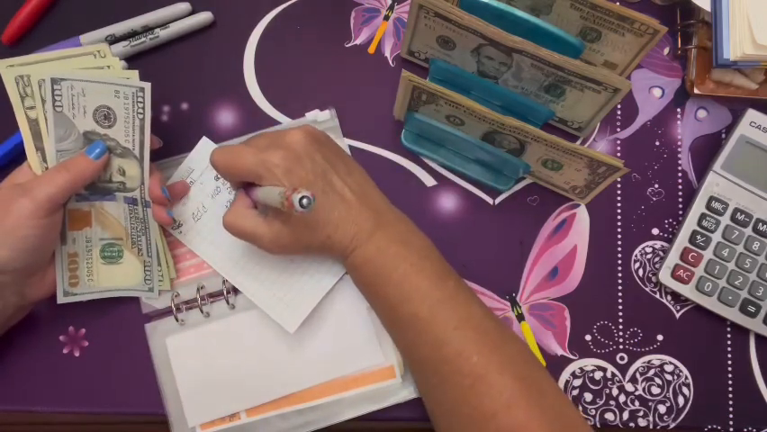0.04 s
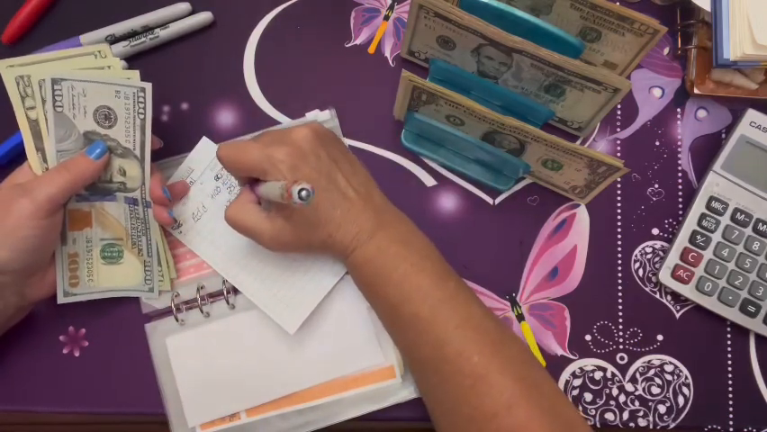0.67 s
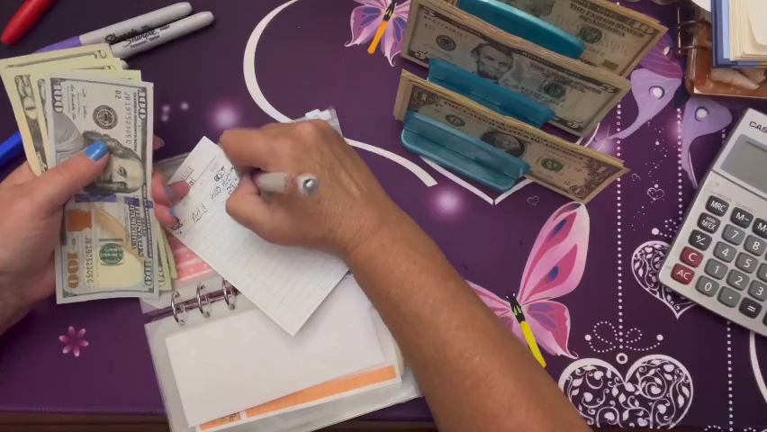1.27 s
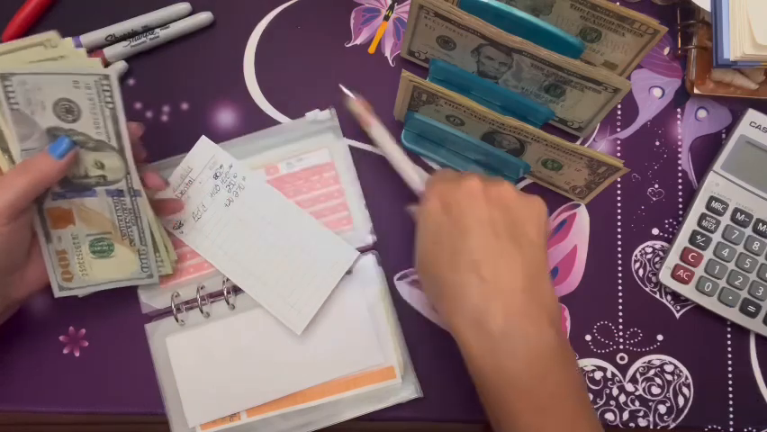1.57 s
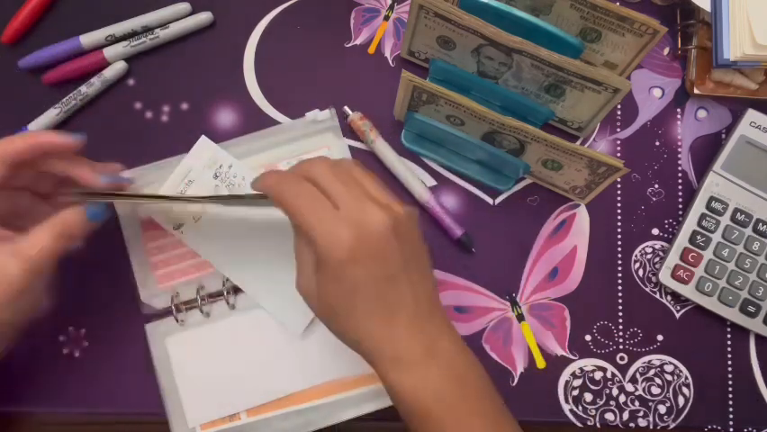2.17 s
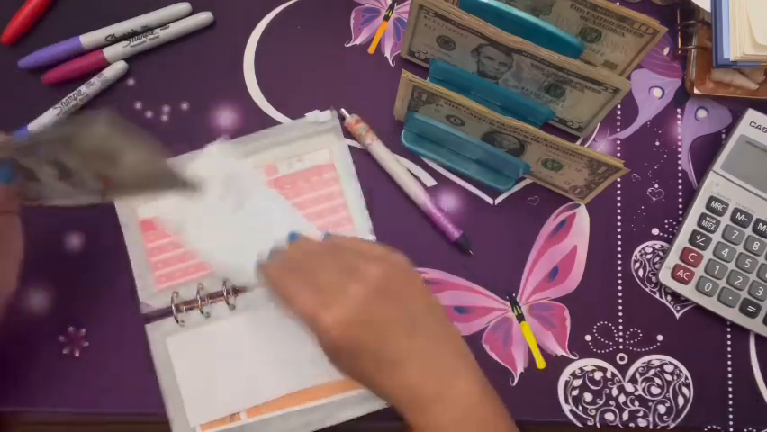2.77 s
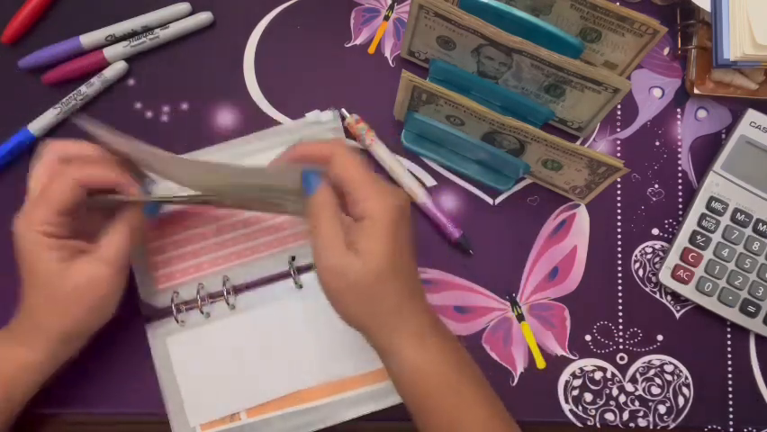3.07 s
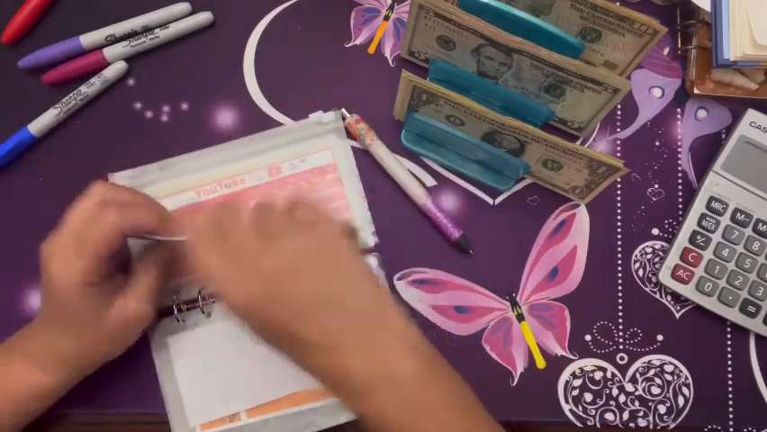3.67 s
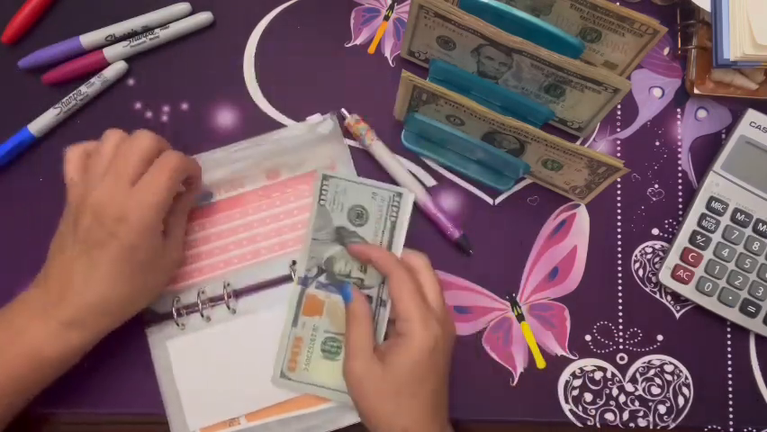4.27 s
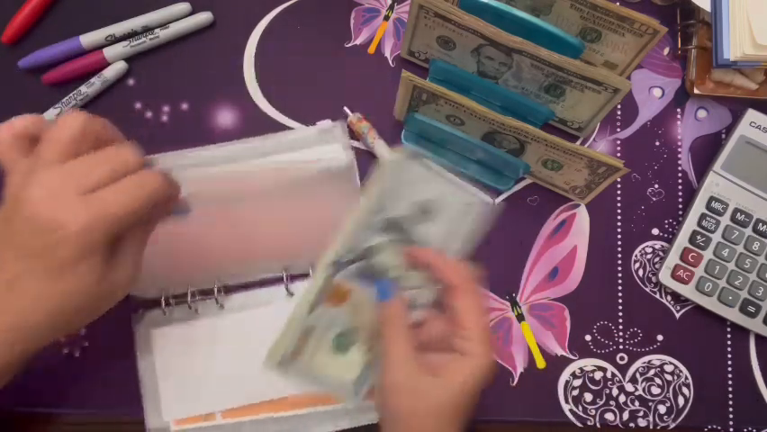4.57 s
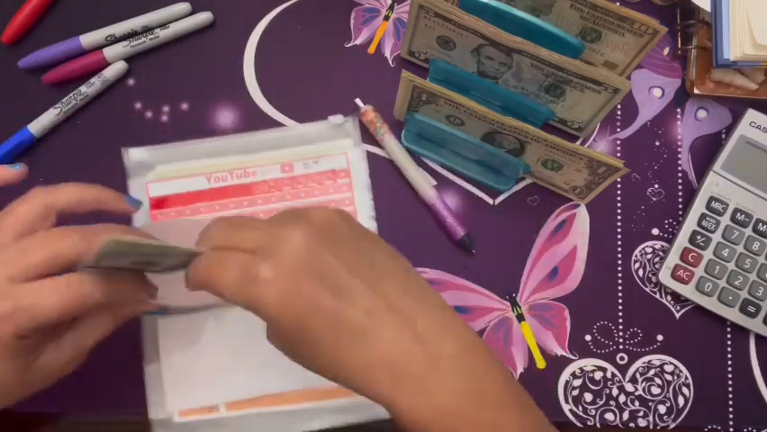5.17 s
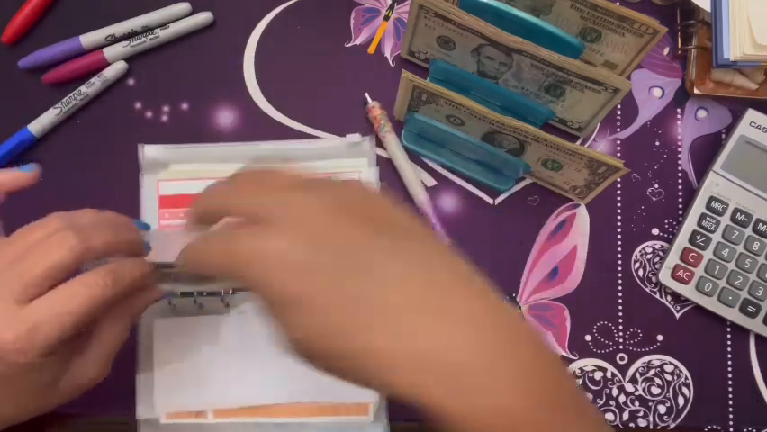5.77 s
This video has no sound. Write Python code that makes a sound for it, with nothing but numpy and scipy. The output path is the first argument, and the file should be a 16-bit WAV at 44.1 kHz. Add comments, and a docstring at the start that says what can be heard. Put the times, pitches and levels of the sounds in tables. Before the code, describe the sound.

A pen ticks faintly and clacks onto a desk, then banknotes are tapped, rustled and slid into crackling plastic over a faint hum.

```python
"""Banknotes handled at a desk in a small room, close to a stereo microphone: the wad is squared up, a slip
of paper is lifted away, a plastic pouch crackles open and the notes slide in. Creases snap, bulges pop
through, and sliding sheets stick and slip. Before that, a pen ticks faintly on the slip, then is put down:
its barrel clacks and the table top rings. Mains and a distant appliance hum faintly beneath."""
import sys
import numpy as np
from scipy import signal
from scipy.fft import rfft, irfft, next_fast_len
from scipy.io import wavfile
from scipy.ndimage import map_coordinates

SR = 44100
rng = np.random.default_rng(int(sys.argv[2]) if len(sys.argv) > 2 else 0)


def to_wav(sig):
    """Store sig (one row per channel, or 1-D mono) as 16-bit WAV at the path in sys.argv[1].

    Samples outside -1..1 are clipped; the rate is SR.
    """
    pcm = np.clip(np.atleast_2d(sig), -1, 1) * 32767
    pcm = np.round(pcm).astype(np.int16)
    wavfile.write(sys.argv[1], SR, pcm.T)  # frames by channels


N = 256706
TIME = np.arange(N) / SR
FFT_SIZE = next_fast_len(N + SR)
FREQ = np.maximum(np.arange(FFT_SIZE // 2 + 1) * SR / FFT_SIZE, 1)


def wad_landing(start_s=2.195, gap_s=0.007, snap_s=0.003, sheet_hz=1120, crack_hz=4800, edge_db=-6.5):
    """The wad is tapped on its edge: seven notes meet the desk one after another, hardest in mid-run."""
    off_peak = (np.linspace(0, 1, 7) / 0.49 - 1) ** 2
    contacts = []
    for note, off in enumerate(off_peak):
        sheet_db, crack_db = -29 - 23 * off, -31.5 - 7 * off
        contacts.append((start_s + note * gap_s, snap_s, sheet_hz, sheet_db, crack_db, crack_hz, edge_db))
    return snaps(contacts)


# Creases snapping and edges striking, close to the microphone: (time [s], length [s], sheet pitch [Hz],
# sheet level [dB], crack level [dB], crack pitch [Hz], relative edge brightness [dB])
CREASES = [(1.601, 0.00077, 1000, -46.5, -31, 4270, -18), (1.6696, 0.0026, 850, -48, -42, 5400, -4),
           (1.6838, 0.0014, 2300, -24.5, -24, 4950, -8), (1.794, 0.0018, 820, -75, -41.5, 6840, -7),
           (1.826, 0.0017, 1300, -70, -51, 6000, 1), (1.845, 0.0062, 1372, -66, -50.5, 5970, -1),
           (1.8985, 0.00094, 957, -62, -37.5, 6960, -4), (1.92, 0.0013, 1100, -53, -53, 4000, -11),
           (2.044, 0.0077, 840, -59.5, -53.5, 4800, -2), (2.265, 0.00087, 1250, -43, -45, 5200, -12),
           (2.628, 0.0047, 1020, -51.5, -51, 4500, -4), (2.641, 0.0012, 1170, -40.5, -44, 3600, -12),
           (2.651, 0.0018, 1320, -37.5, -39.5, 6200, -18), (2.727, 0.0025, 1192, -42, -53, 5600, -1),
           (2.787, 0.0023, 2130, -43, -37.5, 3970, -5), (3.031, 0.028, 830, -58.5, -50, 5100, -10),
           (3.101, 0.0054, 940, -52, -63, 5200, -4), (3.1261, 0.0019, 1190, -46.5, -35, 5130, -17),
           (3.128, 0.0017, 1130, -36, -28.5, 5360, -16), (3.175, .0011, 1160, -51, -47, 4300, -19),
           (3.5113, 0.0066, 2090, -48.5, -43, 5560, -10), (3.517, 0.0075, 2500, -44.5, -58, 7000, -7),
           (3.679, 0.0034, 1200, -56.5, -47, 5240, -3), (3.697, 0.0016, 990, -48.5, -44.5, 5400, -13),
           (3.732, 0.0048, 1690, -60, -46.5, 8400, -7), (3.937, 0.004, 1080, -68, -56.5, 3660, -8),
           (4.147, .0009, 900, -57, -73, 4700, -13), (4.2151, 0.0014, 1530, -36.5, -34.5, 4860, -24),
           (4.224, .0015, 1600, -52, -54, 6000, -4), (4.2394, 0.0023, 1110, -40.5, -47, 4200, -9),
           (4.248, 0.00085, 990, -45, -56, 4200, -13), (4.3149, 0.0013, 1400, -46.5, -39.5, 6000, -8),
           (4.323, 0.0015, 1400, -51, -40, 5230, -18), (4.357, 0.0038, 764, -49.5, -56, 4000, -11),
           (4.4261, 0.00086, 990, -37.5, -35.5, 3770, -20), (4.4305, 0.00079, 1500, -54, -55, 4700, -13),
           (4.4406, 0.0014, 1270, -35, -62, 3400, -16), (4.4475, 0.0011, 900, -44, -51, 4700, -9),
           (4.471, .003, 1300, -60, -51, 5000, -18), (4.477, 0.0011, 900, -48, -40, 4470, -14),
           (4.499, 0.0027, 1310, -50, -70, 4700, -13), (4.561, 0.0013, 1000, -54, -57, 4200, -16),
           (4.588, 0.0099, 1040, -54.5, -65, 4700, -13), (4.658, 0.0018, 950, -59, -75, 4700, -13),
           (4.672, .002, 650, -60, -70, 4700, -13), (4.683, 0.0068, 1580, -51, -60, 3800, -10),
           (4.689, 0.0028, 1650, -39, -42, 4500, -16), (4.72, 0.0018, 1670, -49, -56, 4700, -16),
           (4.809, 0.007, 1390, -55.5, -73, 4640, -2), (4.9395, .001, 2240, -56, -78, 3420, -6),
           (5.091, 0.0021, 826, -48.5, -72, 4700, -13), (5.193, 0.0014, 1240, -37, -50, 3200, -11),
           (5.399, 0.0085, 1650, -44, -56, 7000, 1), (5.546, 0.0019, 1190, -41, -63, 4700, -20),
           (5.645, .0018, 1300, -55, -71, 4700, -21), (5.687, 0.0017, 1680, -48, -55, 4670, -9),
           (5.782, 0.0016, 970, -52, -52, 7100, -6), (5.803, 0.0018, 1320, -41, -62, 3500, -16)]

def snaps(contacts, flutter_db=-20, flutter_s=0.019):
    """One sharp click and a run of smaller buckles: the sheet rings low, the crease cracks high."""
    out, t = np.zeros(N), TIME[:SR // 20]
    for start, length, sheet_hz, sheet_db, crack_db, crack_hz, edge_db in contacts:
        force = np.exp(-t / length) + from_db(flutter_db) * np.exp(-t / flutter_s)
        buckles = rng.choice([-1, 1], (3, len(t))) * force
        buckles[:, 0] = from_db([11, 14, 14])   # the opening click
        sheet = band(buckles[0], sheet_hz / 1.97, sheet_hz * 1.97)
        crack = band(buckles[1], crack_hz / 1.47, crack_hz * 1.47)
        edge = band(buckles[2], 9200, 15800)
        length_gain = np.sqrt(length * SR / len(t))   # levels hold over the snap's length
        for part, db in (sheet, sheet_db), (crack, crack_db + 0.5), (edge, crack_db + edge_db + 3.5):
            add(out, start, from_db(db) * rms_one(part) * length_gain)
    return out


# Sheets popping through with a hollow ring, close up: (time [s], pitch [Hz], peak level [dB])
BULGES = [(1.899, 913, -45.5), (2.216, 683, -36), (2.2219, 1400, -23), (2.229, 1145, -28),
          (2.236, 461, -40), (2.239, 1200, -29.5), (2.048, 905, -52.5), (2.651, 1350, -34),
          (2.71, 730, -48.5), (2.7285, 1234, -31.5), (3.032, 794, -47), (4.6901, 1690, -39),
          (4.958, 1500, -47), (5.3916, 1570, -32.5), (5.546, 996, -45)]

def pops(rise_cycles=1.48, sag=0.045):
    """A bulge flips over and rings for a few cycles, its pitch sagging as it relaxes."""
    out, t = np.zeros(N), TIME[:SR // 30]
    for start, hz, peak_db in BULGES:
        rise = rise_cycles / hz
        swell = t / rise * np.exp(1 - t / rise)
        pitch = hz * (1 + sag * (2 * np.exp(-t / (2 * rise)) - 1))
        add(out, start, from_db(peak_db) * swell * np.sin(2 * np.pi * np.cumsum(pitch) / SR))
    return out


# Sliding strokes of pen, paper and plastic at the desk: (time [s], push [s], fade [s], flex level [dB],
# hiss level [dB], relative sheen [dB], scrape pitch [Hz], scrape level [dB])
SLIDING_STROKES = [(0.445, 0.018, 0.039, -78, -86, -8, 3800, -77.5),
                   (1.273, 0.044, 0.06, -72.5, -67, 4, 8800, -72),
                   (1.345, 0.045, 0.16, -71.5, -62.5, -1, 2890, -69),
                   (1.604, 0.033, 0.25, -63, -64.5, -8, 3280, -58.5),
                   (1.691, 0.035, 0.076, -64, -50, -21, 2010, -51.5),
                   (1.8, 0.067, 0.25, -61.5, -61, 8, 6100, -64),
                   (1.968, 0.046, 0.071, -80, -60.5, 13.5, 6120, -70),
                   (2.164, 0.034, 0.022, -73, -64.5, 19, 8500, -71),
                   (2.203, 0.021, 0.079, -39.5, -42, -9, 4550, -45),
                   (2.332, 0.082, 0.045, -51, -49.5, 5.5, 4900, -57),
                   (2.47, 0.023, 0.11, -65.5, -66.5, -7, 1180, -75),
                   (2.63, 0.13, 0.11, -54, -48, 2.5, 1230, -80),
                   (2.752, 0.031, 0.015, -52, -44.5, -8, 3750, -47),
                   (2.81, 0.0089, 0.26, -65.5, -60, 0, 4020, -80),
                   (3.019, 0.045, 0.2, -59.5, -51, -9, 6100, -79),
                   (3.222, 0.0071, 0.26, -70, -59.5, -4, 5040, -67.5),
                   (3.448, 0.036, 0.22, -62, -55.5, -10, 5250, -72),
                   (3.591, 0.079, 0.095, -62.5, -53, 3.5, 5940, -73),
                   (3.737, 0.075, 0.17, -65.5, -62, 1.5, 5900, -74),
                   (3.96, 0.025, 0.061, -66.5, -66, -2, 6500, -68.5),
                   (4.1, 0.027, 0.13, -72.5, -71, -4, 1950, -84),
                   (4.223, 0.0085, 0.14, -56.5, -61.5, -8, 1900, -61),
                   (4.345, 0.074, 0.14, -62, -62, 0, 1670, -60),
                   (4.408, 0.062, 0.11, -64, -60, -4, 5400, -77),
                   (4.54, 0.017, 0.26, -62, -63.5, -3, 930, -72),
                   (4.69, .02, 0.31, -66, -76.5, 6, 1480, -80),
                   (4.865, 0.013, 0.022, -80, -78, 12, 7500, -70),
                   (4.96, 0.041, .07, -66, -59, 4.5, 3200, -67),
                   (5.01, 0.06, 0.081, -56.5, -49.5, -1, 3560, -61),
                   (5.151, 0.05, 0.35, -54.5, -58.5, 3, 3100, -59),
                   (5.312, 0.03, 0.33, -49, -53, -17, 3340, -57.5),
                   (5.411, 0.085, 0.044, -47.5, -46, 5, 3560, -56.5),
                   (5.599, 0.063, 0.072, -51, -55.5, 2, 3120, -68),
                   (5.772, 0.024, 0.058, -56, -63, 1, 2030, -68)]

def scraping(band_ratio=1.103, bend=0.034):
    """A sheet's free edge rings at its own pitch in each stroke; the pitch wanders as the sheet bends."""
    out = np.zeros(N)
    grains = stick_slip(per_s=1400, spread_db=2.5, clump_db=4)
    speed = 1 + bend * drift(13.73)
    for start, push, fade, _, _, _, hz, scrape_db in SLIDING_STROKES:
        span = (int(start * SR) + np.arange(SR)) % N
        ringing = rms_one(band(grains[span], hz / band_ratio, hz * band_ratio))
        bent = map_coordinates(ringing, [np.cumsum(speed[span])])
        add(out, start, from_db(scrape_db) * stroke_shape(push, fade) * bent)
    return out


def stroke_shape(push, fade, grip_s=0.0016, swell_db=10.5, fade_db=13.5):
    """A stroke takes hold quickly, swells while it is pushed, then dies ever faster."""
    t = TIME[:SR]
    grip = np.clip(t / grip_s, 0, 1)
    rising_db = -swell_db * np.maximum(1 - t / push, 0)
    dying_db = -fade_db * (np.maximum(t - push, 0) / fade) ** 1.25
    return grip * from_db(rising_db + dying_db)


def stroke_levels(light_touch_db=(-81.5, -89.5, -93)):
    """Flex, hiss and sheen in dB: the strokes add in power to a steady touch of pen tip and fingers."""
    power = from_db(light_touch_db)[:, None] ** 2 * np.ones(N)
    for start, push, fade, flex_db, hiss_db, sheen_db, _, _ in SLIDING_STROKES:
        shape = stroke_shape(push, fade)
        for track, level_db in zip(power, (flex_db, hiss_db, hiss_db + sheen_db)):
            add(track, start, (from_db(level_db) * shape) ** 2)
    return 10 * np.log10(power)


# Close-up spectra of the rubbing: its mid-range rustle, a broader rustle, the sliding hiss and its
# fine sheen: (frequency [Hz], relative level [dB])
MID_RUSTLE_SPECTRUM = [(700, -17.5), (1150, -4.5), (1400, 0), (1700, -1.5), (2100, -1), (2600, -3),
                       (3000, -9.5), (3350, -14), (4000, -8), (7000, -23)]
BROAD_RUSTLE_SPECTRUM = [(200, -2), (420, -4), (800, -6.5), (1100, -6.5), (1550, 0), (2100, -4),
                         (2700, -1.5), (5000, -30)]
HISS_SPECTRUM = [(1200, -30.5), (2400, -7.5), (3300, -2.5), (4600, -2), (6300, 1.5), (8000, -3.5),
                 (11500, -7), (14000, -24)]
SHEEN_SPECTRUM = [(4000, -20), (6500, -1.5), (8000, -3), (11300, -1.5), (13000, -6.5), (15500, -7.5)]
# The rustle is all mid-range until 5.1 s, then some broader rustle mixes in: (time [s], mid share [0-1])
MID_RUSTLE_SHARE = [(5.1, 1), (5.2, 0.7), (5.38, 0.95), (5.7, 0.9)]

def rubbing():
    """Friction grains flex the sheets into a rustle and hiss, with sparser crinkles and a fine sheen."""
    flex_db, hiss_db, sheen_db = stroke_levels()
    share = np.interp(TIME, *np.transpose(MID_RUSTLE_SHARE))
    crinkles = from_db(-6) * stick_slip(per_s=180, spread_db=-0.5, clump_db=-2.5)
    broad_grains = stick_slip(per_s=3200, spread_db=3.5, clump_db=5.5) + crinkles
    mid_grains = stick_slip(per_s=1100, spread_db=1.5, clump_db=2)
    fine_grains = stick_slip(per_s=14000, spread_db=1, clump_db=1) + crinkles
    broad = colour(from_db(flex_db + 1.5) * np.sqrt(1 - share) * broad_grains, BROAD_RUSTLE_SPECTRUM)
    mid = colour(from_db(flex_db - 2) * np.sqrt(share) * mid_grains, MID_RUSTLE_SPECTRUM)
    hiss = colour(from_db(hiss_db - 2) * fine_grains, HISS_SPECTRUM)
    sheen = colour(from_db(sheen_db - 6.5) * fine_grains, SHEEN_SPECTRUM)
    return broad + mid + hiss + sheen


def stick_slip(per_s, spread_db, clump_db):
    """Tiny stick-slip releases of uneven size that come in clumps; rms 1."""
    released = rng.random(N) < per_s / SR
    sizes = from_db(spread_db * np.minimum(rng.exponential(1, N), 4))
    signs = rng.choice([-1, 1], N)
    return rms_one(released * sizes * signs * from_db(clump_db * drift(51)))


def bending(x, spread_db=2.5, rate_hz=17):
    """As a sheet bends and the grip moves, its resonances swell and fade each on their own."""
    centres = np.geomspace(700, 10000, 16)
    responses = np.array([at_hz(np.c_[centres, share], FREQ) for share in np.eye(len(centres))])
    return sum(part * from_db(spread_db * drift(rate_hz)) for part in filtered(x, responses))


# Catches along the pouch's seal, close to the microphone: (time [s], relative level [dB])
SEAL_CATCHES = [(4.3722, 1), (4.3817, 2), (4.3948, 0.5), (4.4022, 0), (4.411, 1), (4.4208, 0)]

def seal_peeling(snap_s=0.0007, sheet_hz=1520, sheet_db=-47.5, crack_hz=5440, crack_db=-49.5, edge_db=-12):
    """The seal peels open in a quick run of plastic snaps, one for each catch that lets go."""
    return snaps([(start, snap_s, sheet_hz, sheet_db + db, crack_db + db, crack_hz, edge_db)
                  for start, db in SEAL_CATCHES])


# The pen put down on the desk, near the microphone: (time [s], strike level [dB])
PEN_CLACKS = [(1.6027, -43.5), (1.6843, -26.5), (1.6862, -40), (1.6935, -56)]
# Modes of its barrel: (frequency [Hz], level [dB], t60 [s])
BARREL_MODES = [(1590, -6, .012), (1580, -27, 0.13), (2040, -15.5, 0.11), (2170, -13, 0.048),
                (2660, -12.5, .11), (2810, -13, .12), (3850, -37, .1), (3980, -28, .13), (3740, -5, 0.0026),
                (6400, 4, .004), (8300, 4, 0.0057), (10800, -8, .0028)]

def pen_clacking():
    """Hard plastic contacts ring the pen's barrel, which is too thin to radiate lows."""
    knocks = np.zeros(N)
    for start, level_db in PEN_CLACKS:
        add(knocks, start, from_db([level_db]))
    return band(ring(knocks, BARREL_MODES), 1300, 12000, order=3)


# The pen tip on the slip, faint even from close by:
# (time [s], crack level [dB], crack pitch [Hz], slip level [dB])
TIP_TOUCHES = [(0.203, -63.5, 4230, -62), (0.316, -68, 5900, -68), (0.391, -70.5, 3480, -62.5),
               (0.547, -66, 4400, -65), (0.611, -69.5, 4260, -77), (0.661, -66, 7660, -64),
               (0.702, -65.5, 4800, -65), (0.852, -69, 8200, -75), (1.006, -63, 5860, -69),
               (1.031, -62.5, 3930, -60.5), (1.0942, -61, 8200, -64), (1.259, -54.5, 4220, -53.5),
               (1.523, -60, 5000, -72)]

def pen_ticking(tick_s=0.0019, slip_hz=1400, edge_db=-13):
    """The tip touches down between letters with a tiny crack that rings the slip."""
    return snaps([(start, tick_s, slip_hz, slip_db, crack_db, crack_hz, edge_db)
                  for start, crack_db, crack_hz, slip_db in TIP_TOUCHES])


# Pen and hands bumping the desk, near the microphone: (time [s], push level [dB], contact [s])
DESK_BUMPS = [(1.6046, -21.5, 0.002), (1.6164, -29.5, 0.0017), (1.6712, -30.5, 0.0019),
              (1.6846, -30, 0.0019), (1.689, -19, 0.0039), (1.702, -39.5, 0.0015), (1.7428, -31.5, 0.0019),
              (1.753, -37, 0.0019), (1.796, -37.5, 0.0018), (1.828, -47, 0.0016), (2.216, -45.5, 0.002),
              (3.128, -50.5, 0.0019), (4.442, -36.5, 0.0025), (4.501, -41, 0.0047), (4.59, -55, 0.0016),
              (4.692, -50.5, 0.0015), (5.092, -53.5, 0.0013), (5.195, -50.5, 0.0017),
              (5.392, -46.5, 0.0018)]
# Modes of the table top: (frequency [Hz], level [dB], t60 [s])
DESK_MODES = [(82, -17, 0.4), (129.6, -8.5, 0.23), (193, -13.5, 0.13), (266, -6.5, 0.062), (313, -3, 0.067),
              (385, 2.5, 0.033), (463, 4, 0.036), (568, -4, 0.036), (660, 5.5, 0.026), (736, -3.5, 0.038)]

def desk_bumping():
    """Soft half-sine pushes set the table top's modes ringing."""
    force = np.zeros(N)
    for start, level_db, contact_s in DESK_BUMPS:
        pulse = np.sin(np.pi * np.minimum(TIME[:SR // 50] / contact_s, 1))
        add(force, start, from_db(level_db) * pulse / pulse.sum())
    return band(ring(force, DESK_MODES), 85, 800, order=4)


# Decay of the small room around the desk: (frequency [Hz], t60 [s])
ROOM_DECAY = [(100, 0.74), (800, 0.45), (1500, 0.2), (2200, 0.4), (5500, 0.11), (14000, 0.14)]

def room(x, wet_db, width_db, build_s=0.0008):
    """A diffuse tail that builds within milliseconds and dies sooner in the treble."""
    t, tail = TIME[:SR // 2], 0
    edges = np.geomspace(60, 16000, 9)
    for low, high in zip(edges, edges[1:]):
        decay = np.exp(-np.log(1000) * t / at_hz(ROOM_DECAY, np.sqrt(low * high)))
        tail = tail + band(rng.standard_normal((2, len(t))), low, high) * decay
    build = 1 - np.exp(-(t / build_s) ** 2)
    tail = rms_one(tail * build) / np.sqrt(len(t))
    return from_db(wet_db) * widened(*filtered(x, rfft(tail, FFT_SIZE)), width_db)


# Width of the room at the microphone: (frequency [Hz], relative side level [dB])
SIDE_SPECTRUM = [(60, -14.5), (130, -18.5), (300, -10.5), (600, -3), (1300, 0), (2600, 4), (3700, -5),
                 (5500, -39), (7000, -15), (13000, -31)]

def widened(mid, side, width_db):
    """Diffuse sound differs between the microphone's two ports, most in the middle range."""
    return mid + filtered(side, from_db(at_hz(SIDE_SPECTRUM, FREQ) + width_db)) * [[1], [-1]]


# Hum of the mains and of a distant appliance: (frequency [Hz], level [dB])
HUM_LINES = [(59.2, -64), (119.6, -59.5), (195, -66), (240, -76)]
# The room's air, all around the microphone: (frequency [Hz], relative level [dB])
AIR_SPECTRUM = [(25, -4.5), (45, -10.5), (75, 3.5), (100, -2.5), (165, 4.5), (230, -3), (290, -6.5),
                (600, -18.5), (850, -21), (1200, -21.5), (1800, -34.5), (2500, -40.5), (6000, -38.5),
                (15000, -44)]

def room_tone(waver=0.28, air_db=-63):
    """Slightly wavering hum lines over the low rush of the room."""
    hum = np.zeros(N)
    for hz, level_db in HUM_LINES:
        amplitude = from_db(level_db) * np.sqrt(2) * (1 + waver * drift(6.7))
        hum += amplitude * np.sin(2 * np.pi * hz * TIME + drift(1.96))
    air = colour(rng.standard_normal((2, N)), AIR_SPECTRUM)
    return hum + from_db(air_db) * widened(*air, width_db=3.5)


def from_db(db):
    return 10 ** (np.asarray(db) / 20)


def rms_one(x):
    return x / np.sqrt(np.mean(x ** 2) + 1e-20)


def at_hz(points, hz):
    """Read a table on a log-frequency axis."""
    points = np.array(points)
    return np.interp(np.log(hz), np.log(points[:, 0]), points[:, 1])


def filtered(x, response):
    return irfft(rfft(x, FFT_SIZE) * response, FFT_SIZE)[..., :N]


def colour(x, spectrum):
    """Causal (minimum-phase) filter that keeps the power of white noise."""
    gain = rms_one(from_db(at_hz(spectrum, FREQ)))
    cepstrum = irfft(np.log(gain), FFT_SIZE)
    cepstrum[1:FFT_SIZE // 2] *= 2
    cepstrum[FFT_SIZE // 2 + 1:] = 0
    return filtered(x, np.exp(rfft(cepstrum)))


def band(x, low_hz, high_hz, order=2):
    edges = [min(low_hz, .4 * SR), min(high_hz, .45 * SR)]
    return signal.sosfilt(signal.butter(order, edges, "band", fs=SR, output="sos"), x)


def drift(rate_hz):
    """A slow random wander; rms 1."""
    return rms_one(filtered(rng.standard_normal(FFT_SIZE), 1 / (1 + (FREQ / rate_hz) ** 2)))


def add(track, start_s, sound):
    start = int(start_s * SR)
    track[start:start + len(sound)] += sound[:N - start]


def ring(force, modes):
    """A body's damped modes driven by a force."""
    out = np.zeros(N)
    for hz, mode_db, t60 in modes:
        radius = np.exp(-np.log(1000) / (t60 * SR))
        real = radius * np.cos(2 * np.pi * hz / SR)
        out += from_db(mode_db) * signal.lfilter([1, -real], [1, -2 * real, radius ** 2], force + 1e-18)
    return out


def scene():
    """Hands at work on the desk, heard from close by and through the room."""
    handling = bending(rubbing()) + scraping()
    handling += pen_ticking() + snaps(CREASES) + wad_landing() + seal_peeling() + pops() + pen_clacking()
    bumps = desk_bumping()
    echoes = room(handling, wet_db=-9.5, width_db=-3.5) + room(bumps, wet_db=-11, width_db=-4)
    return handling + bumps + echoes + room_tone()


# Response of the microphone at the desk: (frequency [Hz], level [dB])
MIC_RESPONSE = [(100, -0.5), (1900, -1), (2200, -0.5), (2430, -5.5), (2800, -2.5), (3300, -1.5),
                (6000, -1.5), (7200, -2.5), (8200, -1)]

def record(dry, balance_db=0.13, in_step_hz=5400, opposed_hz=13200, cutoff_hz=15900):
    """Two ports colour the sound and fall into nearly opposite phase across the treble; the top is cut."""
    sides = np.array([[1], [-1]])
    treble = np.clip((FREQ - in_step_hz) / (opposed_hz - in_step_hz), 0, 1)
    phase_offset = 0.99 * np.pi * treble ** 0.87
    ports = from_db(at_hz(MIC_RESPONSE, FREQ) + balance_db * sides) * np.exp(-.5j * sides * phase_offset)
    lowpass = signal.ellip(10, .1, 80, cutoff_hz, fs=SR, output="sos")
    return signal.sosfilt(lowpass, filtered(dry, ports))


dry = scene()
out = record(dry)
to_wav(out)
```